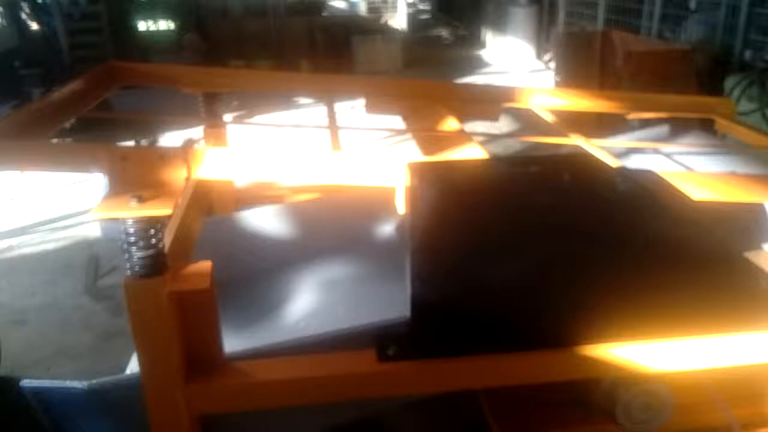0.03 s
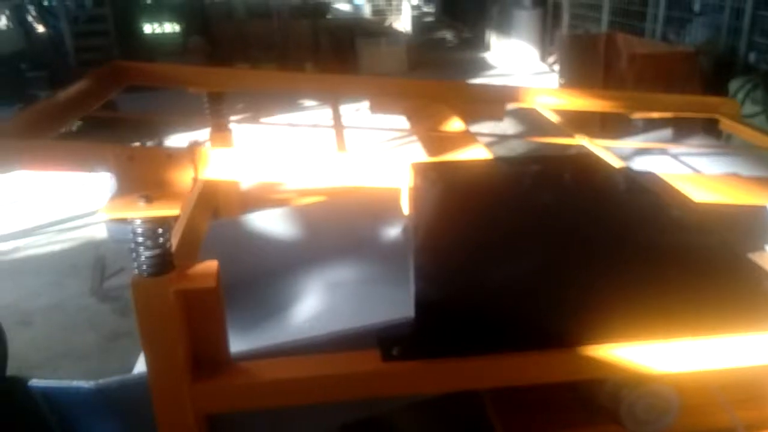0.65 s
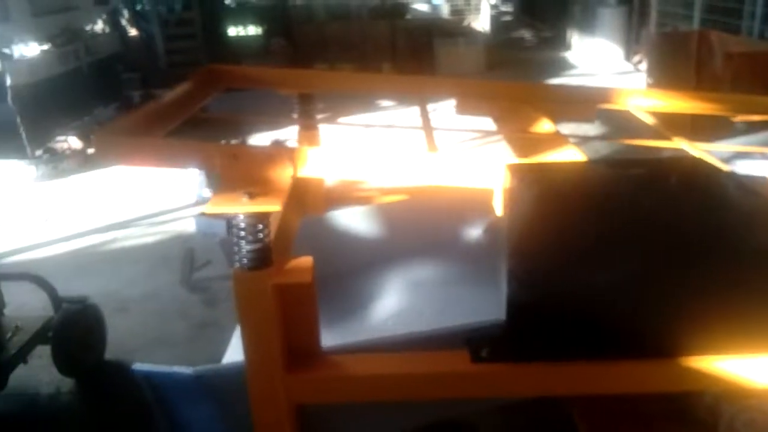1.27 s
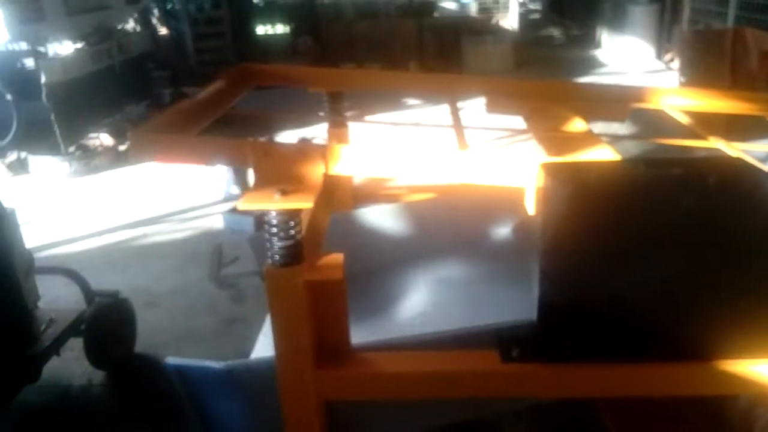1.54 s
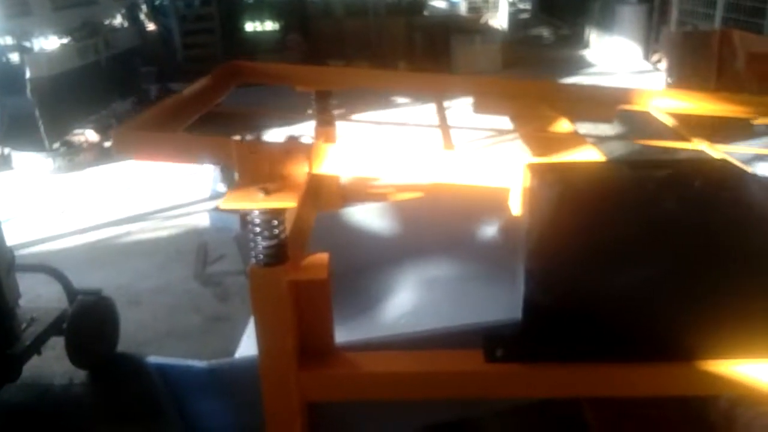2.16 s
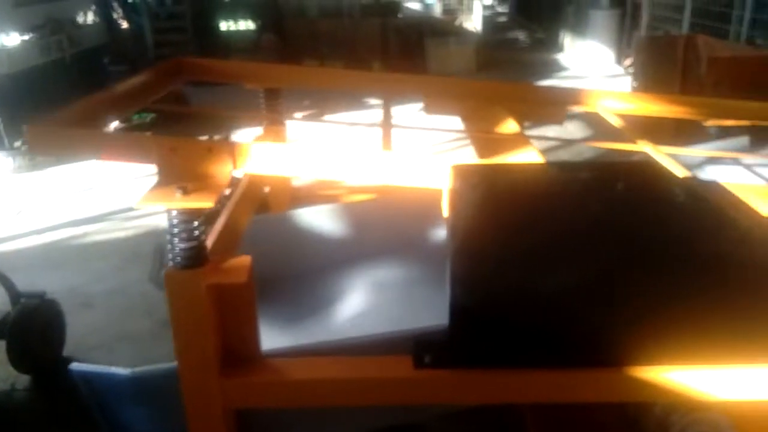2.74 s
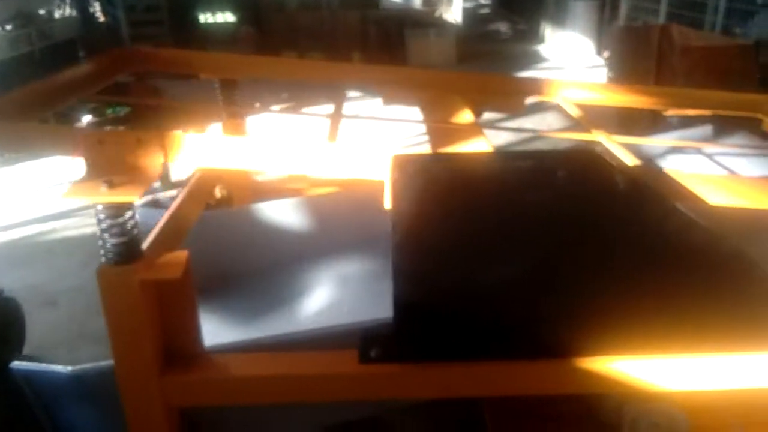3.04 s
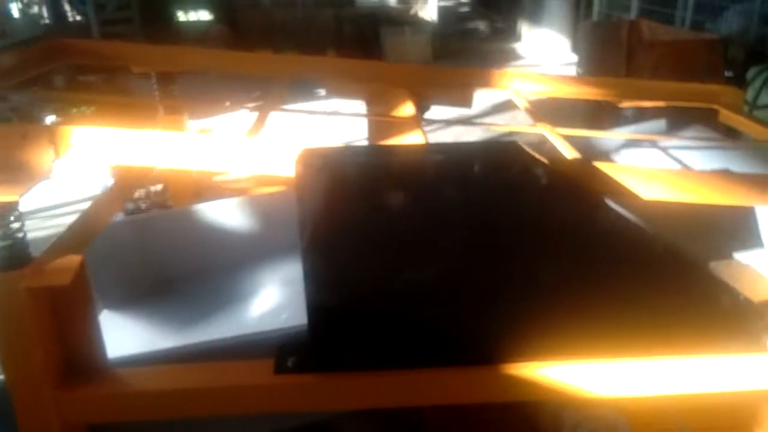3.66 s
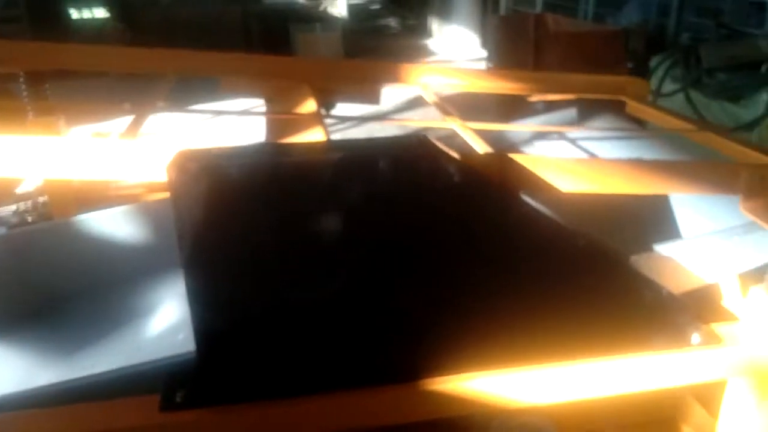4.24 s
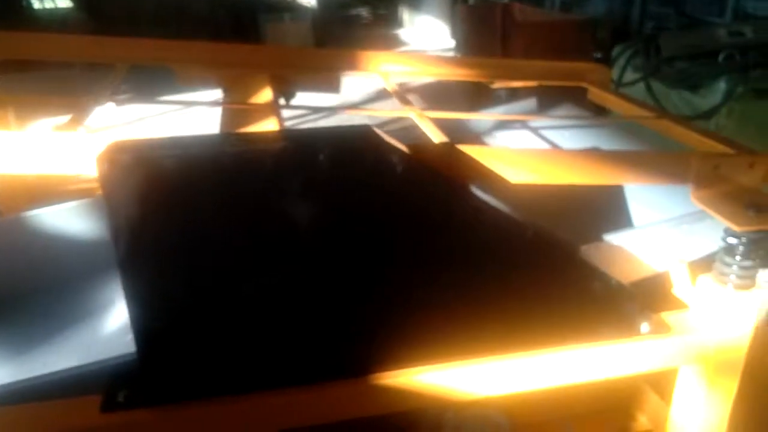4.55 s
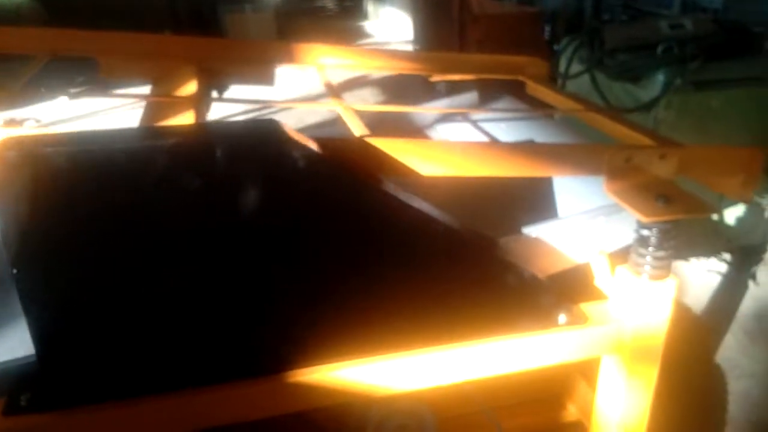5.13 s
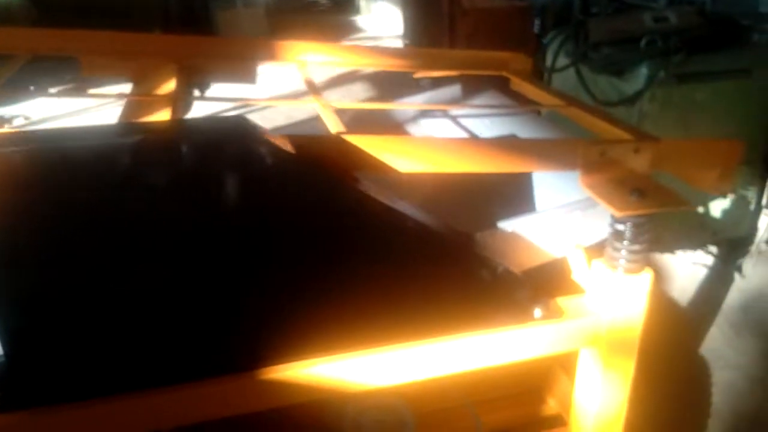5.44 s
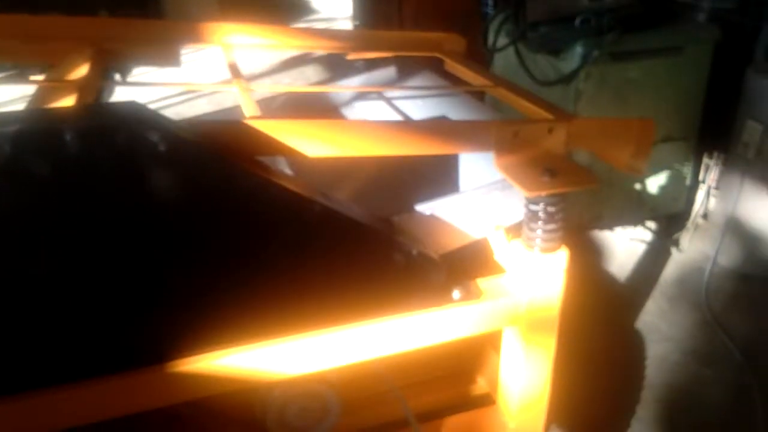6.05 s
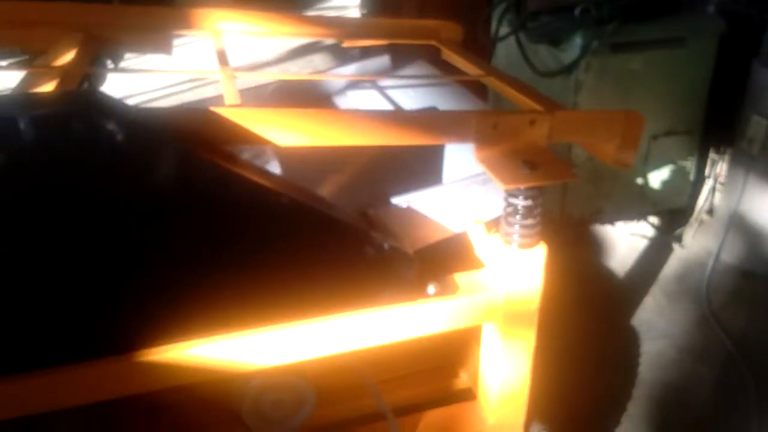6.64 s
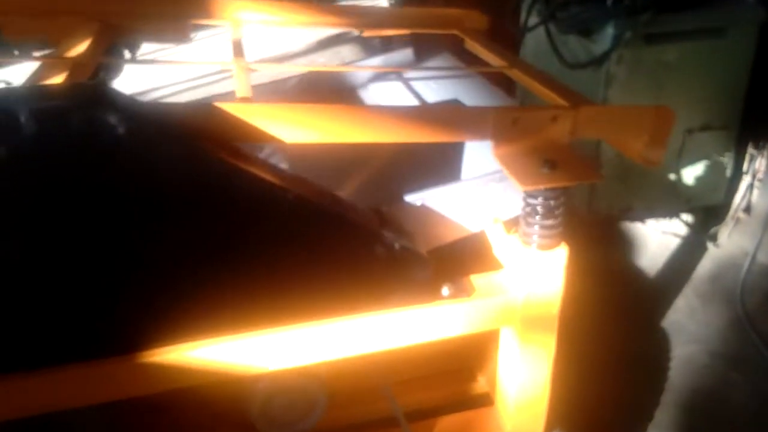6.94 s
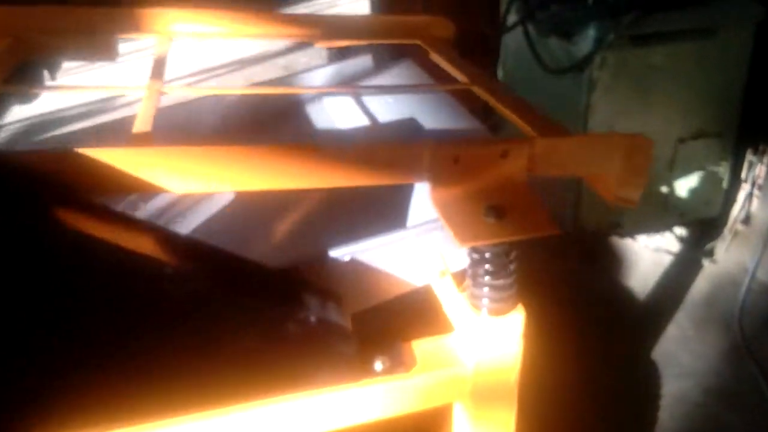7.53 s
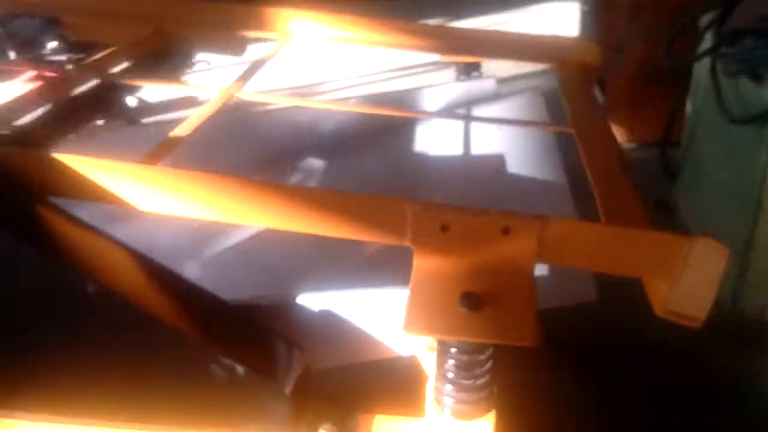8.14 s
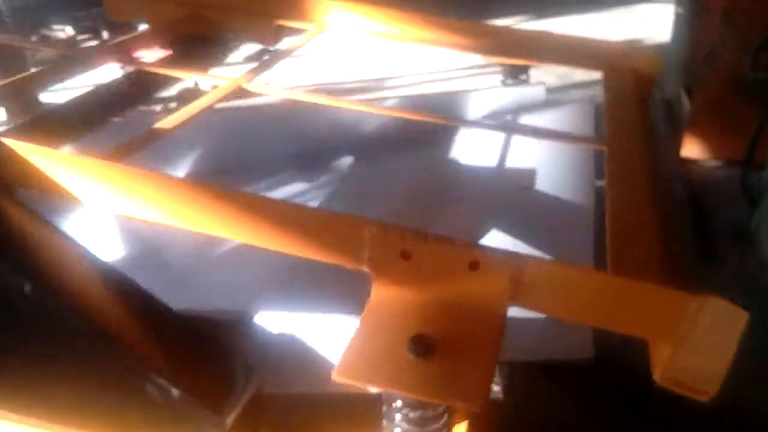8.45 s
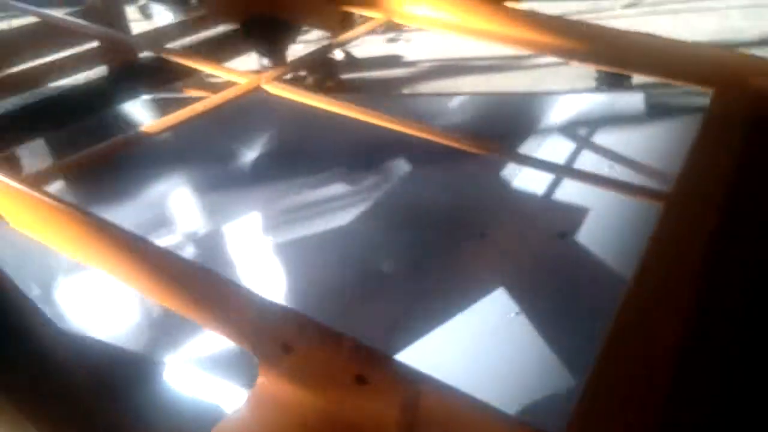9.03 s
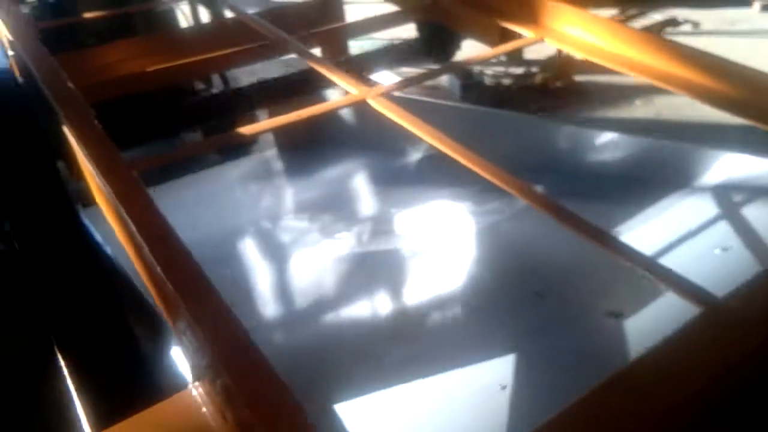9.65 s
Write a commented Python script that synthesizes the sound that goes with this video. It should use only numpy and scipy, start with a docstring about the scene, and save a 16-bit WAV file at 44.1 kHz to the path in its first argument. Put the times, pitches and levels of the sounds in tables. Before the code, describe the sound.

An empty motorised sand sieve shakes in a workshop, coming in quickly after a moment of silence. A low hum and dull rumble carry a fast, continuous chatter of sheet metal and wire mesh. Sharp, uneven steel clanks ring over it with a short room echo. As the close microphone travels from the front round a corner to above the tray, the rattle grows a little stronger, with harder knocks and faint metallic singing.

```python
"""Empty sand screener in a workshop

One microphone, carried from the front of the machine round its corner and over the tray.
An unbalanced shaft shakes the sprung steel frame 15 times a second: the frame hums, the sheet-metal
tray drums and rattles, panels knock and the wire screen jangles. On many turns a loose steel part
lands with a bright clank that rings in the room, and now and then a thin part sings."""
import sys
import numpy as np
from scipy import signal
from scipy.fft import rfft, irfft
from scipy.io import wavfile

SR = 44100
rng = np.random.default_rng(int(sys.argv[2]) if len(sys.argv) > 2 else 0)


def inscribe(sig):
    """Save sig as 16-bit PCM at rate SR to the path in sys.argv[1].

    A 1-D sig is mono; a 2-D sig holds one channel per row.
    Samples are clipped to [-1, 1] before scaling.
    """
    pcm = np.round(np.clip(np.atleast_2d(sig).T, -1, 1) * 32767)
    wavfile.write(sys.argv[1], SR, pcm.astype(np.int16))


N = 436149
TIME = np.arange(N) / SR
SHAFT_HZ = 14.975
STROKE_TURNS = 0.2   # the tray is shaken hardest this long after the frame lands


def from_db(db):
    """Decibels to gain."""
    return 10 ** (np.asarray(db) / 20)


def rms_one(x):
    """Scale to rms 1."""
    return x / np.sqrt(np.mean(x ** 2) + 1e-20)


def curve_at(rows, s=TIME):
    """A curve of (seconds, value) rows, read at times s."""
    return np.interp(s, *np.transpose(rows))


def drift(rate_hz):
    """Smooth random wander of rms about 1."""
    step, settle = 40, 2000
    pole = np.exp(-2 * np.pi * step * rate_hz / SR)
    noise = rng.standard_normal(N // step + settle + 2)
    slow = signal.lfilter([1], [1, -2 * pole, pole * pole], noise)[settle:]
    return np.interp(np.arange(N) / step, np.arange(len(slow)), rms_one(slow))


def colour(x, spectrum):
    """Minimum-phase filter that follows (Hz, dB) rows and falls away past their ends."""
    size = 8192
    hz, db = np.transpose(spectrum)
    bins = np.maximum(np.arange(size // 2 + 1) * SR / size, 1)
    octaves_outside = np.maximum(np.log2(bins / hz[-1]), 0) + np.maximum(np.log2(hz[0] / bins), 0)
    gain = from_db(np.interp(np.log(bins), np.log(hz), db) - 20 * np.minimum(octaves_outside, 2))
    cepstrum = irfft(np.log(gain))[:size // 2]
    cepstrum[1:] *= 2
    response = irfft(np.exp(rfft(cepstrum, size)))[:size // 2]
    return signal.oaconvolve(x, response)[:len(x)]


def resonate(x, hz, width_hz):
    """One resonance, rms 1."""
    pole = np.exp(-np.pi * width_hz / SR)
    feedback = [1, -2 * pole * np.cos(2 * np.pi * hz / SR), pole * pole]
    return rms_one(signal.lfilter([1, 0, -1], feedback, x))


def diffuse(x, t60):
    """Each impact hits another spot and wakes a new mixture of countless modes, which die together."""
    decay = from_db(-120 / (t60 * SR))
    power = signal.lfilter([1 - decay], [1, -decay], x * x + 1e-18)
    return rng.standard_normal(N) * np.sqrt(power)


def steel_ring(x, t60):
    """The dense but unchanging modes of one steel part."""
    t = TIME[:SR // 2]
    tail = rng.standard_normal(len(t)) * from_db(-60 * t / t60)
    return signal.oaconvolve(x, tail / np.linalg.norm(tail))[:N]


def struck_steel(taps, t60, modes_db, diffuse_db):
    """Taps on steel: the contact itself, a diffuse ringing and the part's own modes."""
    wash = from_db(diffuse_db) * diffuse(taps, t60)
    return rms_one(taps + wash + from_db(modes_db) * steel_ring(taps, t60))


def contacts(turns, per_s, throb_db, spread_db, limp=0.093):
    """Small random impacts, harder on one side of each turn; the springs favour every second bounce."""
    stroke = np.cos(2 * np.pi * turns) + limp * np.cos(np.pi * turns)
    force_db = throb_db * stroke + spread_db * np.minimum(rng.exponential(1, N), 3.5)
    hits = rng.random(N) < per_s / SR
    return rms_one(hits * rng.choice([-1, 1], N) * from_db(force_db))


# The walk round the machine. Each row: time in seconds, place (0 front, 1 corner, 2 over the tray).
MIC_PATH = [(2.8, 0), (5.0, 0.76), (6.5, 0.85), (8.2, 1.28), (9.3, 1.8)]


def at_mic(place_db, s=TIME):
    """Level in dB at the microphone, between those at the front, at the corner and over the tray."""
    return np.interp(curve_at(MIC_PATH, s), [0, 1, 2], place_db)


# How far the sprung frame trails the shaft. Each row: time in seconds, lag in turns.
FRAME_LAG = [(1.1, 0.08), (2.1, -0.018), (2.7, 0.15), (3.3, 0.034), (4.3, 0.21), (5.2, 0.42), (5.6, -0.12),
             (6.9, -.03), (7.6, 0.11), (9.2, 0.023), (9.7, 0.21)]


def landing_times():
    """The frame reaches the bottom of its bounce once in every turn of the shaft."""
    turn = np.arange(int(N / SR * SHAFT_HZ))
    return (turn + curve_at(FRAME_LAG, turn / SHAFT_HZ)) / SHAFT_HZ


def sprung_bounce(turns):
    """Phase in turns of the sprung parts, which follow the shaft a little unevenly."""
    return turns - curve_at(FRAME_LAG) - STROKE_TURNS + 0.11 * drift(3.8)


# The hum's partials. Each row: multiple of the shaft rate, then relative level in dB
# at the front, at the corner and over the tray.
HUM_PARTIALS = [(7, -20.0, -19.0, -11.0), (8, 0.0, 0.0, 0.0), (9, -13.0, -13.0, -13.0),
                (10, -10.0, -3.0, -2.0), (12, -15.0, -7.0, -13.0), (14, -9.0, -6.0, -18.0),
                (15, -16.0, -13.0, -20.0), (16, -1.0, -3.0, -7.0), (17, -10.0, -8.0, -21.0),
                (18, -13.0, -13.0, -9.0), (19, -16.0, -20.0, -22.0), (20, -22.0, -16.0, -23.0),
                (24, -15.0, -15.0, -24.0)]
# The hum's rise and fall. Each row: time in seconds, relative level in dB.
HUM_CURVE = [(0.95, -26.5), (1.1, -34), (1.74, -27), (4.42, -30), (4.92, -25.5), (7.16, -30.5), (9.73, -25),
             (9.8, -27.5)]


def frame_hum(turns, waver_db, wander_turns, gain_db):
    """The frame radiates multiples of the shaft rate; their mixture changes as the microphone moves."""
    out = np.zeros(N)
    for order, *place_db in HUM_PARTIALS:
        phase = order * turns + rng.random() + wander_turns * drift(0.44)
        partial_db = at_mic(place_db) + waver_db * drift(0.76)
        out += from_db(partial_db) * np.sin(2 * np.pi * phase)
    return np.sqrt(2) * from_db(gain_db + curve_at(HUM_CURVE)) * out


# The tray's dull boom. Each row: frequency in Hz, relative level in dB.
DRUM_SPECTRUM = [(25, -25.5), (45, -16), (70, -10), (100, -2), (130, 2.5), (180, 3.5), (260, -2), (330, 1),
                 (420, -12.5), (600, -11), (1200, -42)]
# How hard the tray drums. Each row: time in seconds, relative level in dB.
DRUM_CURVE = [(0.85, -25.5), (1.15, -21), (1.35, -26), (1.59, -27), (2.97, -29), (4.19, -24.5), (6.76, -30),
              (7.78, -22), (7.83, -19.5), (7.95, -22), (9.8, -27.5)]


def tray_drumming(bounce, buckle_db, gain_db):
    """The thin tray flaps on the up and the down stroke, giving dull thumps."""
    thumps = contacts(2 * bounce, per_s=700, throb_db=-1.5, spread_db=1.5)
    thumps *= from_db(buckle_db * drift(13))
    return from_db(gain_db + curve_at(DRUM_CURVE)) * rms_one(colour(thumps, DRUM_SPECTRUM))


# The tray's chatter. Each row: frequency in Hz, relative level in dB.
RATTLE_SPECTRUM = [(250, -13), (420, -1), (560, -4), (720, 1), (1050, 1.5), (1400, -2), (1800, -1.5),
                   (2200, -1.5), (2800, -12), (4500, -13)]
# The steel panels' modes. Each row: frequency in Hz, width in Hz, then relative level in dB
# at the front, at the corner and over the tray.
PANEL_RESONANCES = [(506, 180, -27, -37, -13), (712, 88, -8, -18.5, -8), (1018, 34, -10, -16.5, -10),
                    (1244, 11, -13.5, -13.5, -7.5), (1510, 52, -15, -11, -21), (1631, 25, -22, -10.5, -9.5),
                    (1825, 22, -22, -7, -16), (2472, 30, -12, -17, -7), (2730, 77, -36, -37, -13),
                    (2915, 40, -11, -19, -30), (3290, 64, -24, -20, -20), (3650, 78, -26, -38, -23),
                    (3890, 91, -15.5, -14, -37)]


def tray_rattle(bounce, place_db, panel_db, drum_share):
    """Tray and frame chatter and ring the panels; the level follows a share of the drumming's swing."""
    taps = contacts(bounce, per_s=1500, throb_db=0.5, spread_db=2.5)
    chatter = struck_steel(taps, t60=0.068, modes_db=-6, diffuse_db=3.5)
    out = rms_one(colour(chatter, RATTLE_SPECTRUM))
    for hz, width_hz, *mode_db in PANEL_RESONANCES:
        mode = resonate(diffuse(taps, t60=0.0029), hz, width_hz)
        out += from_db(panel_db + at_mic(mode_db)) * mode
    drum_db = curve_at(DRUM_CURVE)
    return from_db(at_mic(place_db) + drum_share * (drum_db - drum_db.mean())) * rms_one(out)


def light_knocks(gain_db, spread_db, scatter_turns):
    """Rows (seconds, Hz, dB): every stroke knocks each panel mode with its own strength and delay."""
    rows, landed = [], landing_times()
    for hz, _, *place_db in PANEL_RESONANCES:
        force, late = rng.standard_normal((2, len(landed)))
        s = np.maximum(landed + (STROKE_TURNS + scatter_turns * late) / SHAFT_HZ, 0)
        db = gain_db + at_mic(place_db, s) + spread_db * np.minimum(force, 1.5)
        rows += zip(s, np.full(len(s), hz), db)
    return rows


# The hardest knocks on the panels. Each row: start in seconds, frequency in Hz, level in dB.
HARD_KNOCKS = [(4.82, 1850, -18), (5.172, 1810, -23), (5.363, 1850, -16), (5.871, 1820, -18),
               (7.415, 1826, -24), (7.465, 1007, -20), (7.808, 970, -18), (8.012, 1810, -18),
               (8.221, 1790, -17.5), (8.357, 1005, -17), (8.559, 985, -29), (8.875, 1010, -18),
               (9.101, 1252, -17), (9.137, 2500, -20), (9.542, 2478, -19)]


def panel_knocks(rise_s, t60, detune, roughness):
    """A panel rings up over a brief, chattering contact and dies away, a little differently each time."""
    rows = list(HARD_KNOCKS) + light_knocks(gain_db=-22, spread_db=4, scatter_turns=0.09)
    out, t = np.zeros(N + SR), TIME[:SR // 8]
    envelope = (1 - np.exp(-t / rise_s)) ** 2 * from_db(-60 * t / t60)
    envelope /= envelope.max()
    for (s, hz, db), (offset, phase) in zip(rows, rng.uniform(-1.095, 1, (len(rows), 2))):
        at = int(s * SR)
        tone = np.sin(2 * np.pi * (hz * (1 + detune * offset) * t + phase))
        out[at:at + len(t)] += from_db(db) * envelope * tone
    return out[:N] * (1 + roughness * drift(150))


# The wire screen's jangle and its sizzle. Each row: frequency in Hz, relative level in dB.
JANGLE_SPECTRUM = [(1500, -25), (2100, -4), (2500, 4.5), (3200, 1.5), (3900, 1), (4400, -4), (5100, -12),
                   (6500, -14), (10000, -39)]
SIZZLE_SPECTRUM = [(3500, -12.5), (5000, 4.5), (7000, 2), (8000, -1.5), (9100, 0), (9800, -2),
                   (10600, -12.5), (13000, -21), (15500, -46)]


def wire_screen(bounce, jangle_db, sizzle_db):
    """The wire screen jangles on its frame, with a fine sizzle on top."""
    taps = contacts(bounce, per_s=1300, throb_db=1.5, spread_db=5)
    wires = struck_steel(taps, t60=0.11, modes_db=10, diffuse_db=7)
    jangle = from_db(jangle_db) * rms_one(colour(wires, JANGLE_SPECTRUM))
    sizzle = from_db(sizzle_db) * rms_one(colour(wires, SIZZLE_SPECTRUM))
    return jangle + sizzle


# The loose part's hard landings. Each row: start in seconds, relative level in dB,
# drive of the body ring against the bright ring in dB.
HARD_LANDINGS = [(1.212, -10.5, -19), (1.2835, -8, -25), (1.405, -10.5, -17), (1.473, -6.5, -20),
                 (1.5452, -3, -22), (1.7386, -8.5, -20), (1.865, -15.5, -15), (1.9338, -9.5, -15),
                 (2.0154, -16.5, -18), (2.1316, -12.5, -15.5), (2.2007, -9, -15.5), (2.3436, -8, -18),
                 (2.5375, -8.5, -26), (2.609, -6.5, -21.5), (2.6813, -2.5, -18.5), (2.8164, -3, -18),
                 (2.9317, -11, -14.5), (3.0093, -10.5, -15), (3.0839, -13.5, -15), (3.2062, -6.5, -15),
                 (3.3508, -8.5, -14), (3.4777, -9, -16), (3.555, -8, -14.5), (3.691, -15, -7.5),
                 (3.82, -11, -8.5), (3.9515, -5, -13.5), (4.1514, -6.5, -12.5), (4.29, -7.5, -11.5),
                 (4.4952, -7, -13.5), (4.6898, -10, -13), (4.7681, -4.5, -14.5), (4.9606, -14.5, -10),
                 (5.041, -13.5, -7.5), (5.2914, -18, -9), (5.358, -10, -9.5), (5.4364, -18.5, -8),
                 (5.601, -12.5, -10.5), (5.6795, -14.5, -10), (5.7974, -18.5, -4.5), (5.8706, -14, -8.5),
                 (5.943, -13, -10), (6.0734, -15, -8.5), (6.2725, -10.5, -12.5), (6.5376, -9.5, -11.5),
                 (6.616, -9.5, -11.5), (6.8113, -6.5, -14), (6.9416, -10, -9), (7.1511, -16, -8.5),
                 (7.2774, -6.5, -12.5), (7.361, -12, -8.5), (7.4874, -9.5, -9), (7.624, -12, -7.5),
                 (7.7452, -14.5, -6.5), (7.8179, -6.5, -11.5), (8.0171, -12.5, -9.5), (8.1613, -11, -12),
                 (8.3523, -8, -12.5), (8.6183, -13.5, -9.5), (8.6882, -16.5, -6.5), (8.8283, -15.5, -6.5),
                 (9.1476, -15.5, -9), (9.3806, -17, -9), (9.5624, -13, -10), (9.6404, -7, -15),
                 (9.7737, -16.5, -12)]


def part_landings(light_db, spread_db, body_share_db, seated_db, loose_from_s):
    """The hard landings and a light one on each other turn; while still seated, the part only ticks."""
    s = landing_times()
    db = light_db + spread_db * rng.standard_normal(len(s)) + seated_db * (s < loose_from_s)
    light = np.column_stack([s, db, np.full(len(s), body_share_db)])
    to_hard_s = abs(s[:, None] - np.array(HARD_LANDINGS)[:, 0]).min(axis=1)
    return np.vstack([HARD_LANDINGS, light[to_hard_s > 0.5 / SHAFT_HZ]])


def workshop_blow(bounces, steel_t60=0.11, modes_db=1, room_t60=0.99, room_db=-10.5):
    """Bounces ring the part's own modes and the frame round it, then the workshop answers."""
    ringing = from_db(modes_db) * steel_ring(bounces, steel_t60) + diffuse(bounces, steel_t60)
    return ringing + from_db(room_db) * diffuse(ringing, room_t60)


# The loose part's bright ring and its body ring. Each row: frequency in Hz, relative level in dB.
BRIGHT_SPECTRUM = [(4500, -16), (6200, -23), (6800, -9), (7500, -9.5), (8200, -3), (8800, -2), (9600, -5.5),
                   (10100, -13.5), (10500, -19), (11500, -26), (13000, -38), (15500, -73)]
BODY_SPECTRUM = [(500, -10), (1000, -0.5), (2000, -7), (3000, -2), (4000, -0.5), (4800, 0), (5500, -5),
                 (6200, -2.5), (7200, -0.5), (10000, -43)]


def loose_part_clanks(chatter_s, bright_db, body_db, bounces=14):
    """Each landing is a quick burst of fading bounces of the same loose steel part."""
    bright, body = np.zeros(N), np.zeros(N)
    rows = part_landings(light_db=-26, spread_db=4, body_share_db=-8, seated_db=-3, loose_from_s=1.2)
    chances = rng.random((len(landing_times()), 2, bounces))
    for (s, db, body_share_db), (timing, push) in zip(rows, chances):
        delay = chatter_s * np.sort(timing - timing.min())
        direction = np.where(push < 0.5, -1, 1)
        force = np.exp(-delay / chatter_s) * direction * (0.5 + abs(2 * push - 1))
        force /= np.linalg.norm(force)
        at = np.minimum(((s + delay) * SR).astype(int), N - 1)
        np.add.at(bright, at, force * from_db(db))
        np.add.at(body, at, force * from_db(db + body_share_db))
    bright_ring = from_db(bright_db) * colour(workshop_blow(bright), BRIGHT_SPECTRUM)
    body_ring = from_db(body_db) * colour(workshop_blow(body), BODY_SPECTRUM)
    return bright_ring + body_ring


# Thin parts that sing for a moment. Each row: middle in seconds, length in seconds,
# frequency in Hz, resonance width in Hz, relative level in dB.
SINGING_PARTS = [(1.75, 0.49, 173, 5.5, -37), (6.055, 0.7, 6820, 120, -42), (7.156, 0.17, 1604, 18, -31),
                 (7.797, 0.69, 965, 10.3, -30.5), (8.052, 0.8, 176.3, 12, -27.5),
                 (8.393, 0.57, 1009, 48, -30.5), (9.42, 0.38, 7700, 300, -40.5),
                 (9.438, .22, 11050, 200, -53)]


def thin_parts_singing(bounce, throb_db):
    """Lightly touching parts ring up at one pitch, pulse with the shaking and fade again."""
    taps = contacts(bounce, per_s=1200, throb_db=1.5, spread_db=1.5)
    out = np.zeros(N)
    for middle_s, length_s, hz, width_hz, db in SINGING_PARTS:
        swell = np.exp(-(2 * (TIME - middle_s) / length_s) ** 4)
        tone = resonate(resonate(taps, hz, width_hz), hz, width_hz)
        out += from_db(db) * swell * tone
    return out * from_db(throb_db * np.cos(2 * np.pi * bounce))


def swell_in(start_s, start_db, db_per_s):
    """Silence, then a quick rise to full level."""
    return (TIME > start_s) * from_db(np.minimum(start_db + db_per_s * (TIME - start_s), 0))


def scene():
    """The machine at the moving microphone, in mono; all its parts move with the one shaft."""
    turns = SHAFT_HZ * TIME
    bounce = sprung_bounce(turns)
    hum = frame_hum(turns, waver_db=1, wander_turns=0.031, gain_db=-1.94)
    drumming = tray_drumming(bounce, buckle_db=0.25, gain_db=-1)
    rattle = tray_rattle(bounce, place_db=(-26.5, -23, -22), panel_db=-1.5, drum_share=0.057)
    knocks = panel_knocks(rise_s=0.0028, t60=0.11, detune=0.017, roughness=0.2)
    screen = wire_screen(bounce, jangle_db=at_mic((-27.5, -32, -25)),
                         sizzle_db=at_mic((-41.5, -43.5, -38)))
    clanks = loose_part_clanks(chatter_s=0.006, bright_db=27, body_db=33.5)
    singing = thin_parts_singing(bounce, throb_db=5.5)
    machine = hum + drumming + rattle + knocks + screen + clanks + singing
    return (swell_in(start_s=0.62, start_db=-14, db_per_s=92) * machine)[None]


def record(dry):
    """After the microphone, peaks are rounded and the highest treble is cut."""
    ceiling, stop_hz = 1.3, 16200
    rounded = ceiling * np.tanh(dry / ceiling)
    return signal.sosfilt(signal.cheby2(12, 70, stop_hz, fs=SR, output="sos"), rounded)


dry = scene()
out = record(dry)
inscribe(out)
```